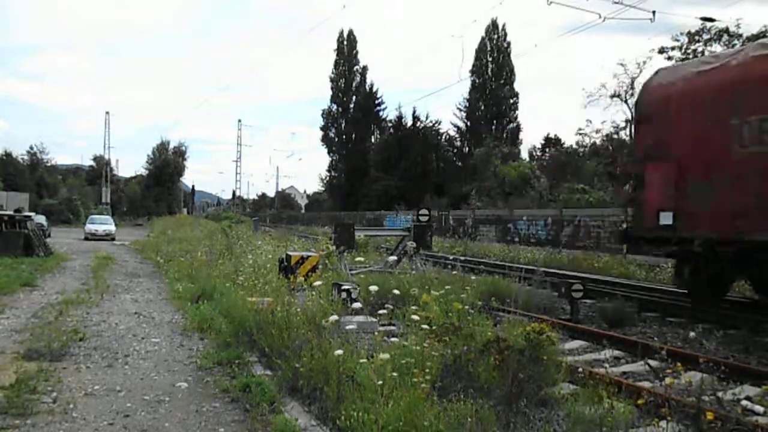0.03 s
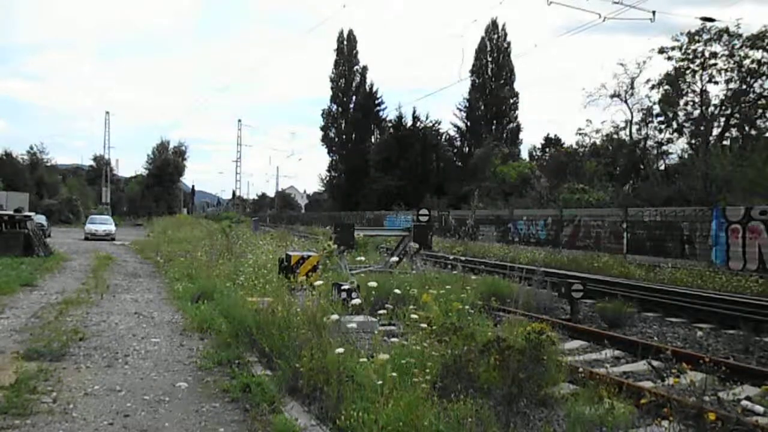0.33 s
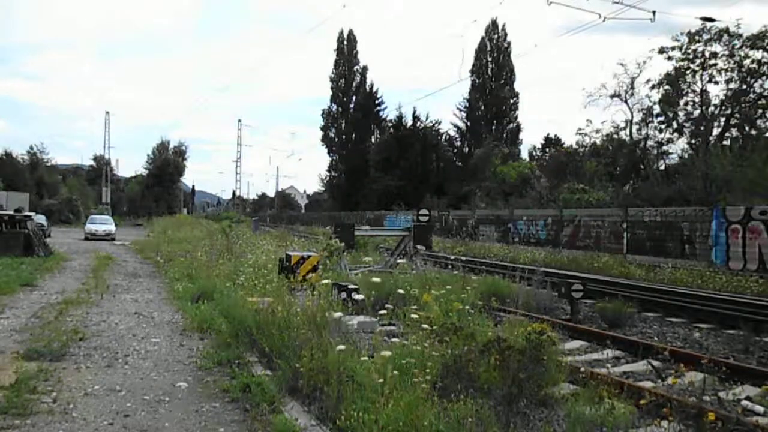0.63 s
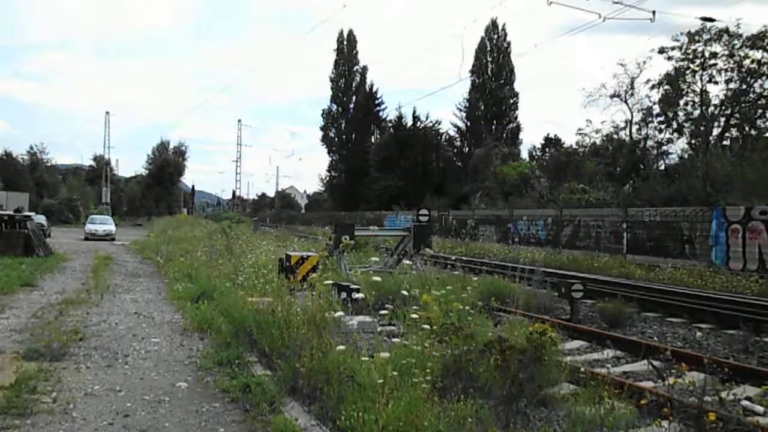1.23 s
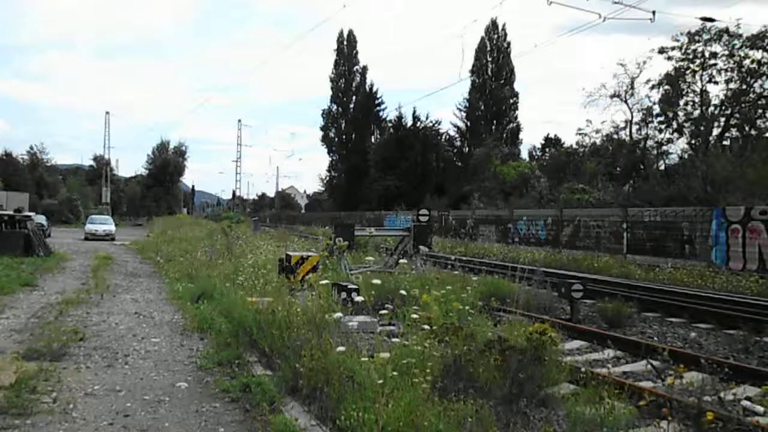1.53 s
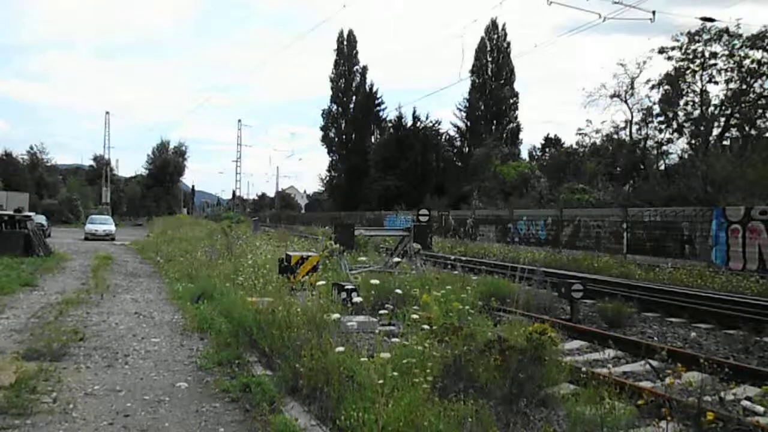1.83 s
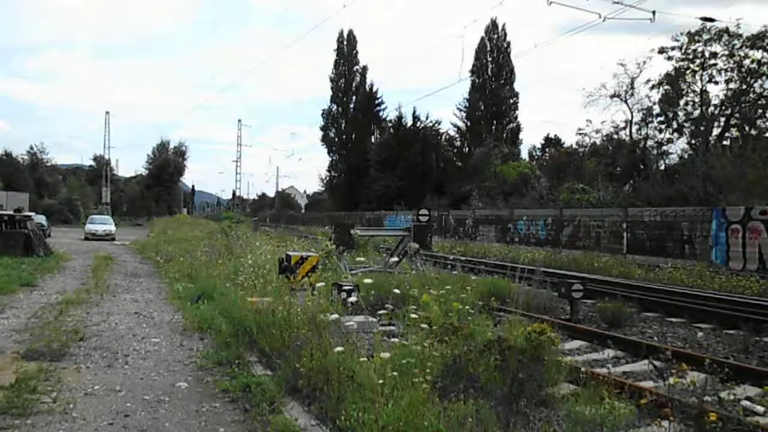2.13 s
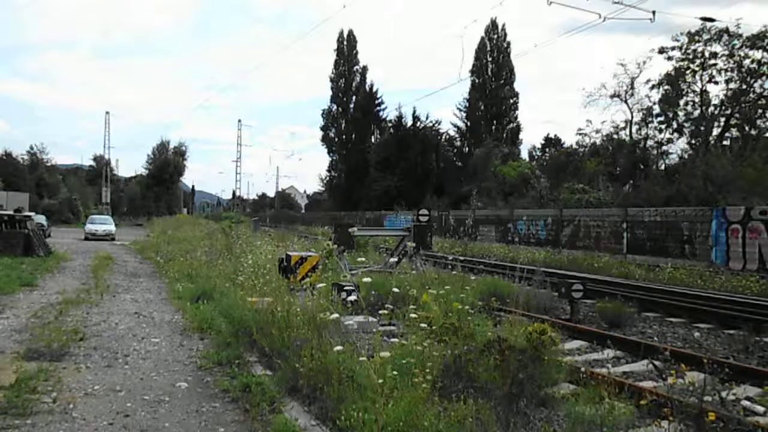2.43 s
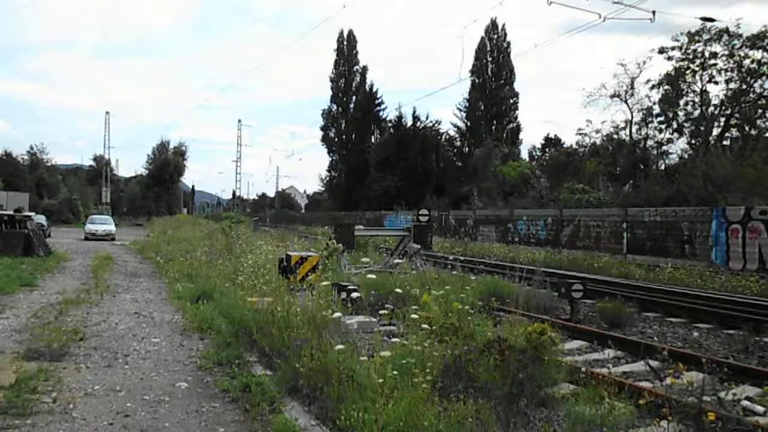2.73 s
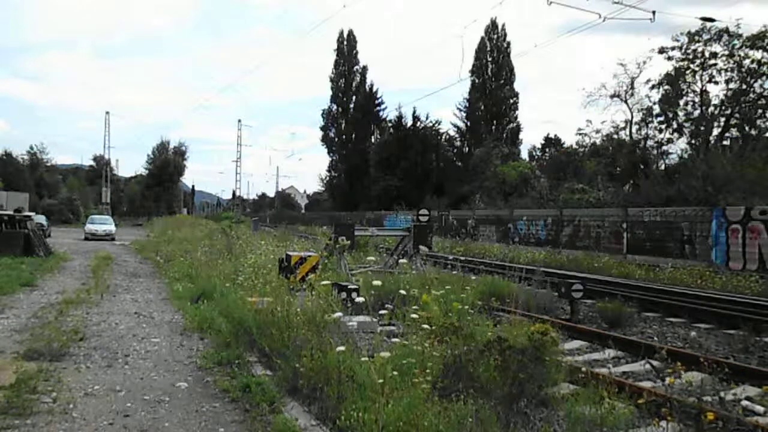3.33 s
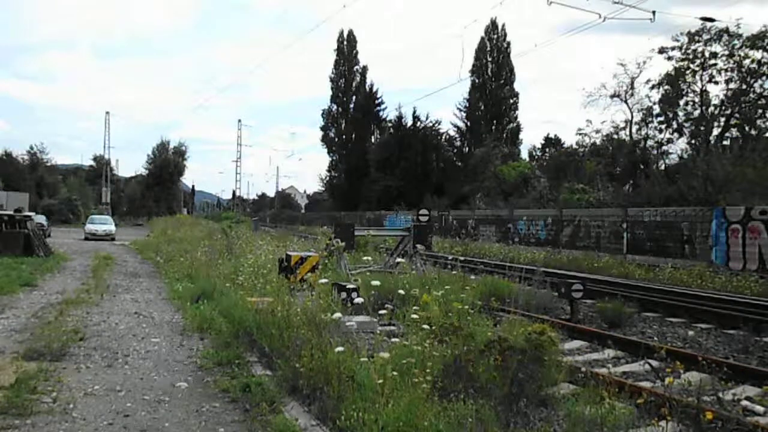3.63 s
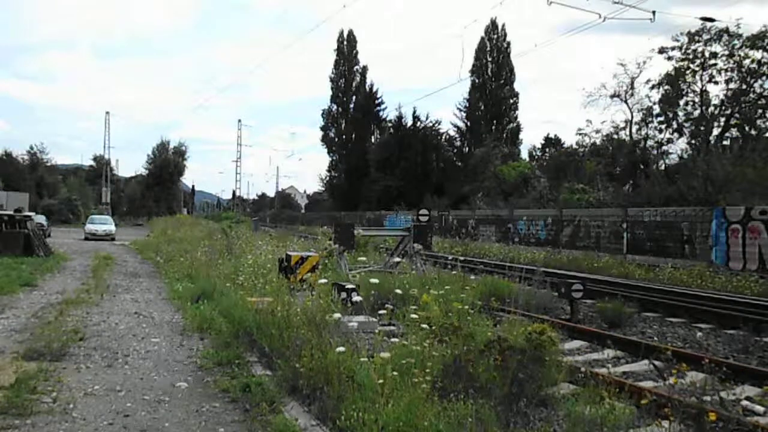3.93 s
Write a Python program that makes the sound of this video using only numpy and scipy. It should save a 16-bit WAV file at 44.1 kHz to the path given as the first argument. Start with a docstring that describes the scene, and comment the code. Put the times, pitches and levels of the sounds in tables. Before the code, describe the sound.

A freight train's last wagon roars past close by, its wheels thumping four times over a rail joint, scraping and squeaking as loose metal clanks. A low distant rumble remains, with faint rail hiss and light wind on the microphone.

```python
"""Beside a railway track, the last wagon of a freight train rolls past and draws away.
Its body roars, the ground rumbles, and its last four axles thump over a joint in the rail.
The steel wheels scrape, ring and squeak on the rail, and loose metal parts clank.
The low rumble of the far train remains, with a faint rail hiss and light wind on the microphone."""
import sys
import numpy as np
from scipy import signal
from scipy.fft import rfft, irfft
from scipy.io import wavfile
from scipy.ndimage import uniform_filter1d

SR = 44100
rng = np.random.default_rng(int(sys.argv[2]) if len(sys.argv) > 2 else 0)


def to_wav(sig):
    """Store sig (one row per channel, or 1-D mono) as 16-bit WAV at the path in sys.argv[1].

    Samples outside -1..1 are clipped; the rate is SR.
    """
    pcm = np.clip(np.atleast_2d(sig), -1, 1) * 32767
    pcm = np.round(pcm).astype(np.int16)
    wavfile.write(sys.argv[1], SR, pcm.T)  # frames by channels


N = 176400
TIME, FREQ = np.arange(N) / SR, np.fft.rfftfreq(N, 1 / SR)


# The tone of the body's roar: pitch_hz, level_db
BODY_TONE = [(30, -24), (90, -13.5), (160, -5), (215, -4), (265, 0.5), (350, -5), (450, -10), (560, -3),
             (680, -8.5), (950, -14.5), (1200, -23.5), (2200, -25.5), (8000, -64)]
# The tone of the shaking ground: pitch_hz, level_db
GROUND_TONE = [(20, -13), (45, -1), (80, 3.5), (135, -3.5), (180, -5.5), (260, -3.5), (380, -8.5),
               (560, -18.5), (750, -18.5), (1400, -22), (5000, -62)]
# Two bogies (the frames that hold the wheels) pass by: nearest_s, level_db
BOGIES = [(.46, -27), (.92, -30.5)]

def wagon(body_db=-26, hold_s=0.16, fade_db_per_s=30.5, near_s=0.11):
    """The body's roar fades as it leaves; the ground rumbles under each passing bogie."""
    roar = amp(body_db - fade_db_per_s * np.maximum(TIME - hold_s, 0)) * noise(colour(BODY_TONE))
    nearness = sum(amp(db) ** 2 / (1 + ((TIME - when) / near_s) ** 2) for when, db in BOGIES)
    return roar + np.sqrt(nearness) * noise(colour(GROUND_TONE))


# Each axle hits the joint (wheels() plays the clash): start_s, thump_db, clash_db
AXLE_HITS = [(0.287, -24, -33.5), (.425, -29.5, -34), (0.721, -23.5, -36.5), (.834, -29.5, -44)]
# The low notes of the bouncing track: pitch_hz, level_db, fade_s
TRACK_NOTES = [(81.6, -0.5, 0.15), (168, 2, .16), (231.6, -6.5, .14)]
# The tone of a shuddering bogie: pitch_hz, level_db
SHUDDER_TONE = [(25, -21), (75, -8.5), (120, 4.5), (180, 2.5), (260, -1.5), (400, -16.5), (620, -8.5),
                (900, -18.5), (1400, -19.5), (3000, -41.5), (8000, -64)]
HIT_RISE_S = 0.0033

def rail_joint():
    """Each axle drops into the joint: the track bounces and the bogie shudders."""
    out = np.zeros(N)
    for start, thump_db, _ in AXLE_HITS:
        bounce = np.zeros(N)
        for hz, db, fade_s in TRACK_NOTES:
            note = np.sin(2 * np.pi * hz * (TIME - start))
            bounce += amp(db) * note * strike(start, HIT_RISE_S, fade_s)
        shudder = strike(start, HIT_RISE_S, fade_s=0.5) * noise(colour(SHUDDER_TONE))
        out += amp(thump_db) * (bounce + shudder)
    return out


# The tone of steel rubbing on steel: pitch_hz, level_db
STEEL_TONE = [(200, -13.5), (900, -6.5), (1400, -8.5), (1900, -9), (2900, -1), (3400, -3.5), (4000, 1.5),
              (5150, 0.5), (5700, -5), (7400, -15.5), (8000, -33), (8800, -36.5)]
# The notes at which wheel and rail ring: pitch_hz, width_hz, level_db
WHEEL_NOTES = [(2400, 90, -9), (2850, 130, -4), (3106, 70, -3), (3704, 70, -2), (4178, 70, -3),
               (4460, 110, -3), (4672, 70, -1), (4975, 70, 1), (5150, 110, 2), (5600, 90, -8),
               (5889, 70, -10), (6090, 70, -9), (6704, 70, -11), (7044, 80, -14), (7500, 110, -17)]
# How loud the rolling wheels hiss: time_s, level_db
ROLLING_LEVEL = [(0, -33), (.16, -32.5), (.26, -38.5), (.56, -34), (.70, -38.5), (.97, -36), (1.15, -41.5),
                 (1.42, -50.5), (1.67, -47.5), (1.85, -53.5), (2.2, -58), (4, -76)]
# A wheel's guiding lip scrapes the rail: peak_s, level_db, rise_s, fall_s, treble_db
SCRAPES = [(.352, -28, 0.012, 0.018, 7), (0.438, -25, 0.021, 0.053, 9), (0.769, -37, 0.025, 0.023, 5),
           (.880, -28, 0.072, 0.083, 3), (1.07, -44, 0.036, 0.046, 7), (1.612, -44.5, 0.022, 0.13, -9),
           (1.96, -49.5, 0.07, .07, -3.5)]

def wheels(ring_db=0.5, treble_hz=5800):
    """Rolling, clashes at the joint and scrapes all make the steel ring."""
    steel = np.hypot(colour(STEEL_TONE), amp(ring_db) * ringing(WHEEL_NOTES))
    power = level(ROLLING_LEVEL) ** 2
    for start, _, clash_db in AXLE_HITS:
        power += (amp(clash_db) * strike(start, HIT_RISE_S, fade_s=1)) ** 2
    out = through(friction() * np.sqrt(power), steel)
    slip = friction()
    treble = 1 - 1 / (1 + (FREQ / treble_hz) ** 8)  # 0 for low pitches, 1 for high ones
    for peak, db, rise, fall, treble_db in SCRAPES:
        pressure = amp(db) * np.exp(-abs(TIME - peak) / np.where(TIME < peak, rise, fall))
        out += through(slip * pressure, steel * amp(treble_db * treble))
    return flare(out)


def friction(grit_db=-10, grains_per_s=810):
    """Steel slides on steel in uneven slips, making a gritty hiss."""
    grit = unit(rng.standard_normal(N) * (rng.random(N) < grains_per_s / SR))
    hiss = rng.standard_normal(N)
    return unit(hiss + amp(grit_db) * grit) * waver(rate_hz=75, depth_db=0.85)


def flare(sound, depth_db=1.9, span_s=0.045, span_hz=260):
    """As the wheel's contact with the rail wanders, nearby notes swell and fade at random."""
    hz, times, spectrum = signal.stft(sound, SR, nperseg=512)
    swell = rng.standard_normal(spectrum.shape)
    swell = uniform_filter1d(swell, round(span_s / times[1]), axis=1)
    swell = unit(uniform_filter1d(swell, round(span_hz / hz[1]), axis=0))
    return signal.istft(spectrum * unit(amp(depth_db * swell)), SR, nperseg=512)[1][:N]


# Short wheel squeaks: peak_s, pitch_hz, level_db, length_s
SQUEAKS = [(.364, 4350, -38.5, .008), (.415, 4672, -33.5, .009), (.498, 5185, -31, .014),
           (.745, 5130, -37.5, .02), (.820, 2720, -40.5, .014), (.830, 3704, -39, .014),
           (.945, 5050, -36.5, .015), (1.085, 4975, -44, .025), (1.603, 3080, -47.5, .015),
           (1.593, 5980, -55, .015), (2.665, 5100, -53, .02), (3.30, 5100, -56.5, .025)]

def squeaks(wobble_hz=75):
    """A slipping wheel briefly sings one unsteady note."""
    out = np.zeros(N)
    for peak, hz, db, length in SQUEAKS:
        wobble = unit(uniform_filter1d(rng.standard_normal(N), size=90))
        note = np.sqrt(2) * np.sin(2 * np.pi * np.cumsum(hz + wobble_hz * wobble) / SR)
        swell = np.exp(1 - np.hypot(1, (TIME - peak) / length))
        out += amp(db) * note * swell
    return out * waver(rate_hz=200, depth_db=1.5)


# Loose parts knock: start_s, level_db
KNOCKS = [(.133, -36), (.438, -43), (1.431, -42.5), (1.94, -50)]
# The notes those parts ring at: pitch_hz, width_hz, level_db
METAL_NOTES = [(926, 170, -14), (1296, 69, 1.5), (1437, 84, -7), (1670, 100, -4), (1980, 150, -10.5),
               (2660, 1200, -20)]

def loose_metal():
    """Loose metal on the wagons knocks and rings with a dull clank."""
    blows = sum(amp(db) * strike(start, rise_s=0.014, fade_s=0.42) for start, db in KNOCKS)
    return blows * noise(ringing(METAL_NOTES))


# The tone of the far train: pitch_hz, level_db
FAR_TONE = [(20, -7), (55, 2.5), (90, -3.5), (140, -6.5), (250, -2), (330, -9), (470, -12), (800, -17),
            (1000, -15.5), (1250, -23), (1550, -25), (1850, -23.5), (2250, -24.5), (3300, -25),
            (3900, -22.5), (5100, -23), (5600, -29), (7600, -34.5), (8300, -44), (8800, -60)]
# How loud it is: time_s, level_db
FAR_LEVEL = [(0, -40.5), (1.6, -37.5), (2.25, -38.5), (3.0, -38), (4, -37.5)]

def far_train():
    """Farther down the line, the train rumbles and the rails hiss."""
    return level(FAR_LEVEL) * noise(colour(FAR_TONE))


# The deep tone of the wind: pitch_hz, level_db
WIND_TONE = [(8, 2.5), (22, -3.5), (52, -0.5), (75, -6), (110, -24), (300, -43), (2000, -81.5)]
# How the gusts rise and fall: time_s, level_db
WIND_LEVEL = [(0, -34), (1.4, -40), (1.6, -45.5), (2.0, -40), (2.5, -35.5), (2.9, -40), (3.12, -35.5),
              (3.6, -38), (4, -38.5)]

def wind():
    """Light gusts push on the microphone with a soft, low rumble."""
    return level(WIND_LEVEL) * noise(colour(WIND_TONE))


def amp(db):
    """Turns decibels into a gain, the number to multiply a sound by."""
    return 10 ** (np.asarray(db) / 20)


def unit(x):
    """Scales a signal to an average strength (rms) of 1."""
    return x / np.sqrt(np.mean(x ** 2) + 1e-20)


def colour(points):
    """A gain for every pitch, from (pitch_hz, level_db) points."""
    hz, db = np.transpose(points)
    return amp(np.interp(np.log(FREQ + 1), np.log(hz + 1), db))


def ringing(notes):
    """A gain for every pitch, with a peak at each ringing note."""
    return sum(amp(db) / (1 + (2 * (FREQ - hz) / width) ** 2) for hz, width, db in notes)


def level(points):
    """A gain for every moment, from (time_s, level_db) points."""
    return amp(np.interp(TIME, *np.transpose(points)))


def noise(tone):
    """Noise of strength 1 with the given tone."""
    return unit(irfft(rfft(rng.standard_normal(N)) * tone, N))


def through(sound, tone):
    """Filters a sound to give it a tone."""
    return signal.fftconvolve(sound, np.fft.fftshift(irfft(unit(tone), N)), "same")


def waver(rate_hz, depth_db):
    """A gain that wanders at random, up to about the given rate."""
    return amp(depth_db * noise(1 / (1 + (FREQ / rate_hz) ** 4)))


def strike(start_s, rise_s, fade_s):
    """The loudness of a blow: it rises quickly, then drops 60 dB in fade_s."""
    age = np.maximum(TIME - start_s, 0)
    return np.minimum(age / rise_s, 1) * np.exp(-np.log(1000) * np.maximum(age - rise_s, 0) / fade_s)


def scene():
    """Adds up all the sounds at one spot beside the track."""
    return (wagon() + rail_joint() + wheels() + squeaks() + loose_metal() + far_train() + wind())[None]


def record(dry):
    """Cuts away the treble above 8900 Hz."""
    low_pass = signal.firwin(401, 8900, window=("kaiser", 9), fs=SR)
    return signal.oaconvolve(dry, low_pass[None], "same")


dry = scene()
out = record(dry)
to_wav(out)
```